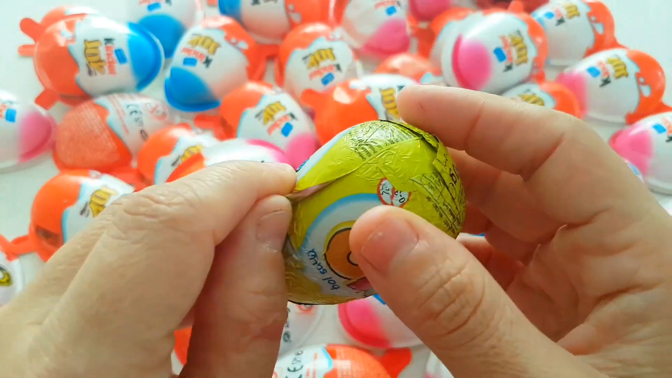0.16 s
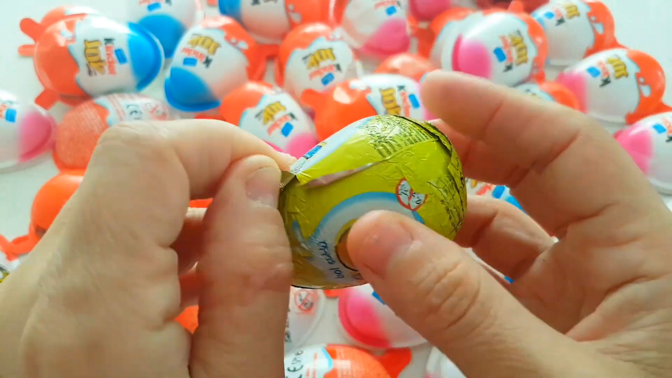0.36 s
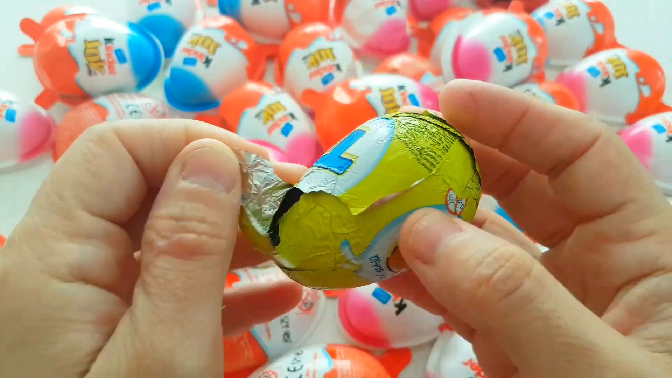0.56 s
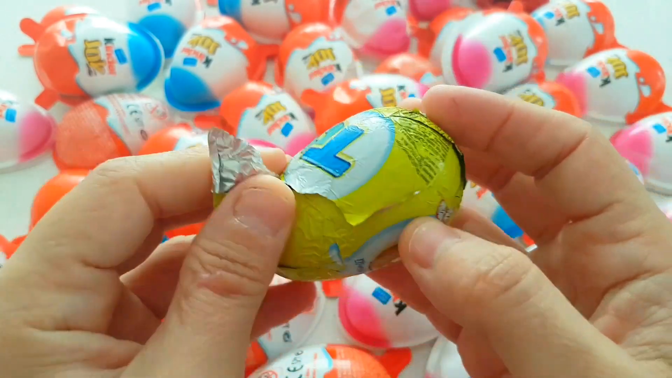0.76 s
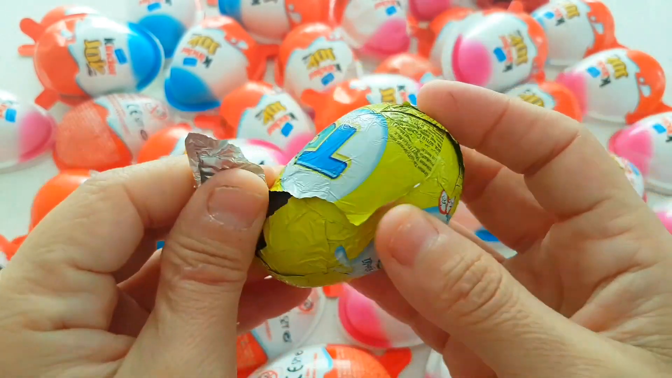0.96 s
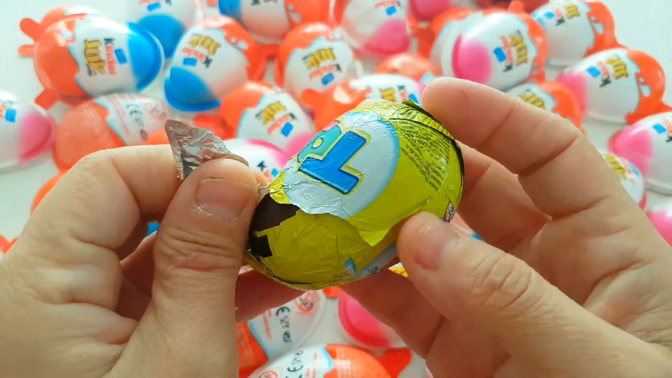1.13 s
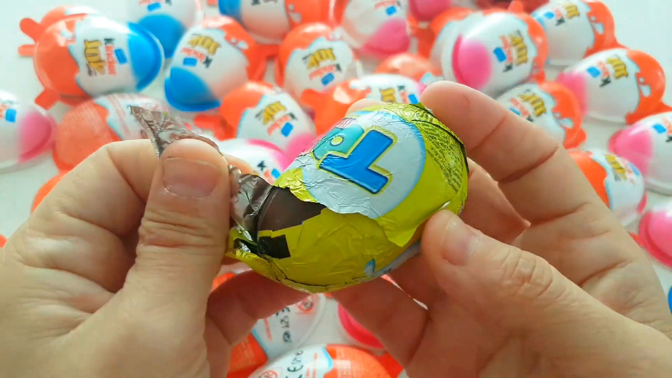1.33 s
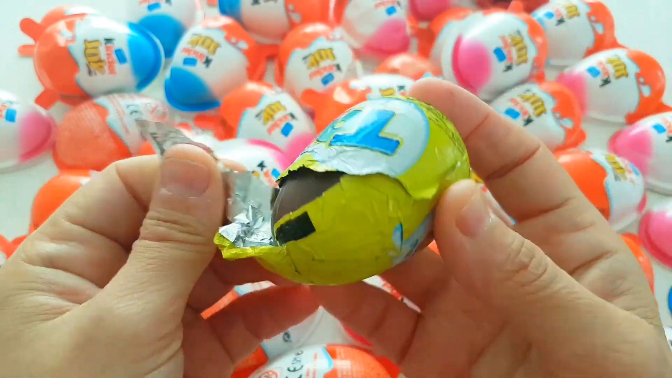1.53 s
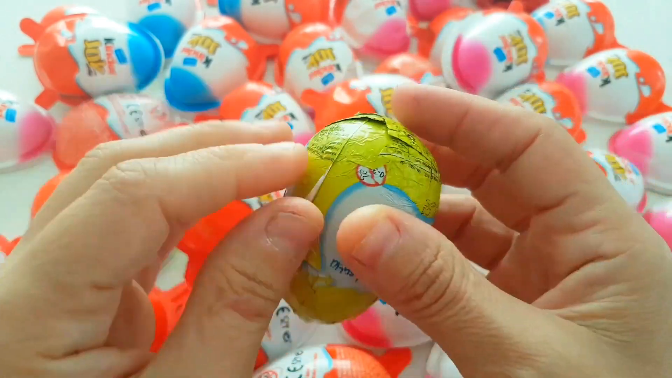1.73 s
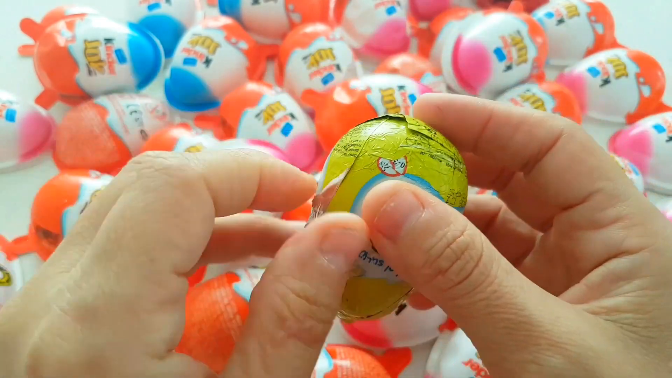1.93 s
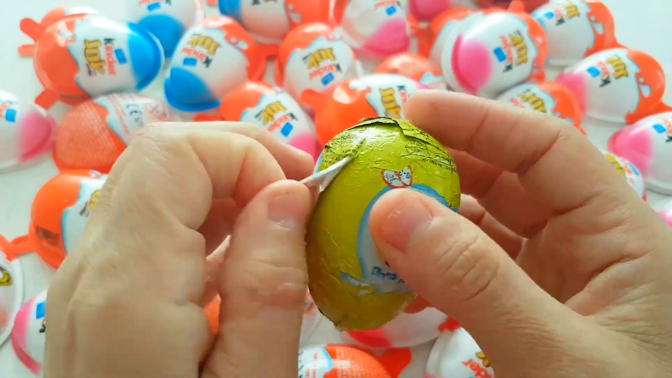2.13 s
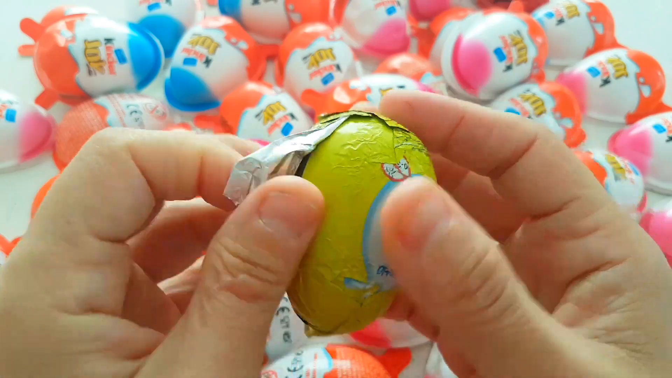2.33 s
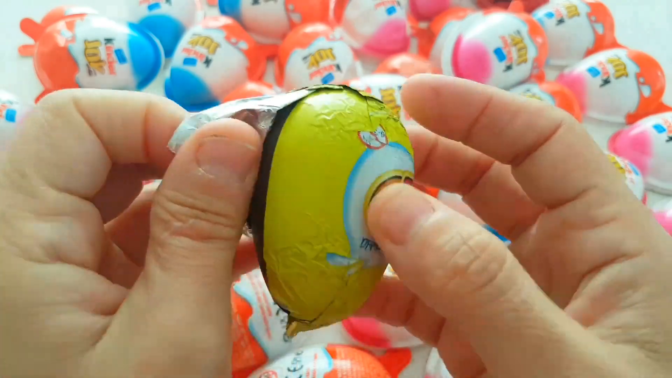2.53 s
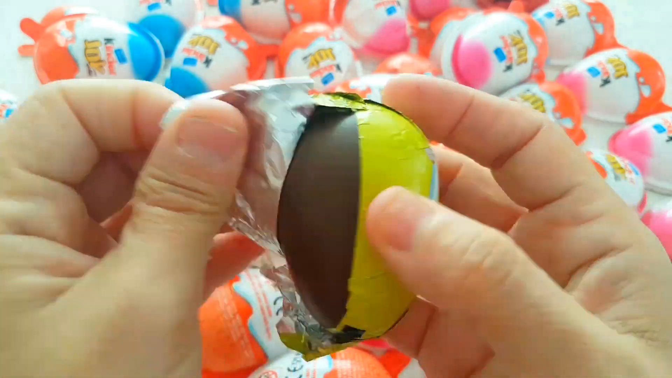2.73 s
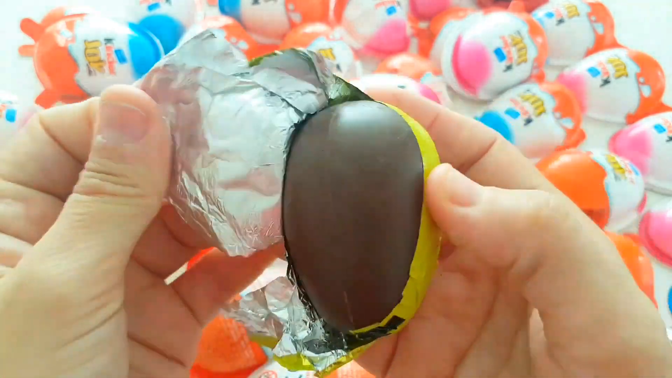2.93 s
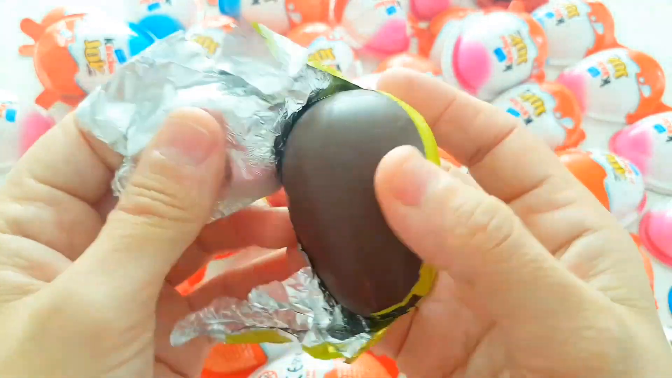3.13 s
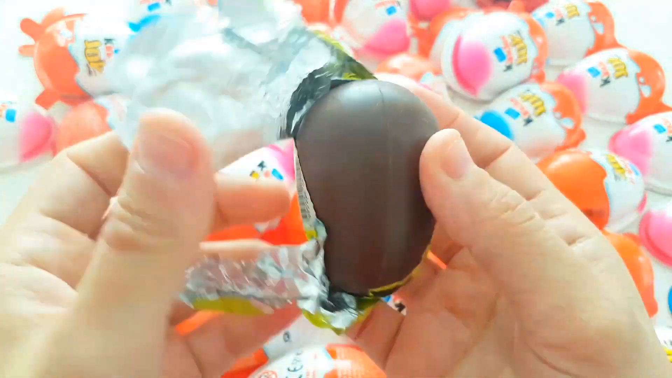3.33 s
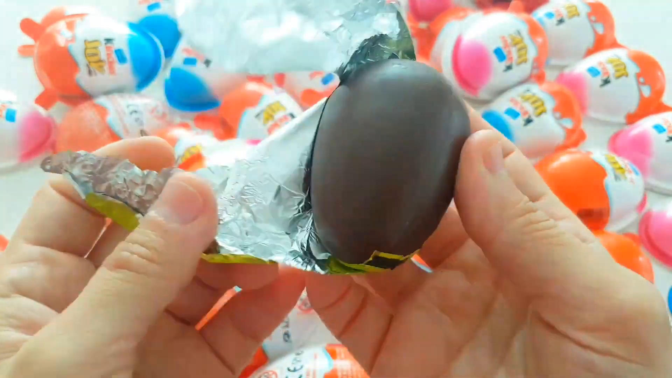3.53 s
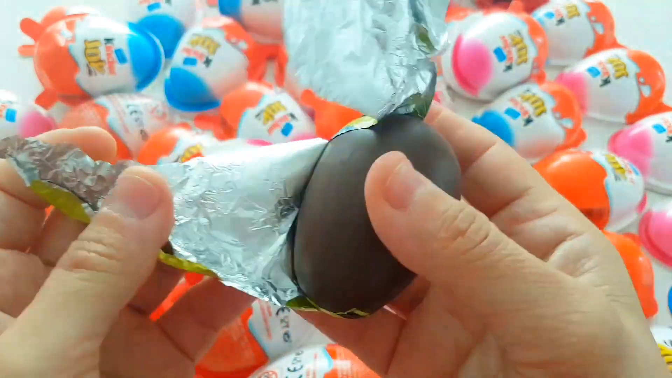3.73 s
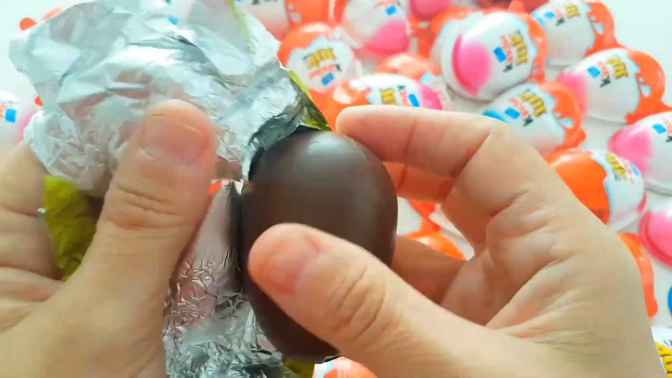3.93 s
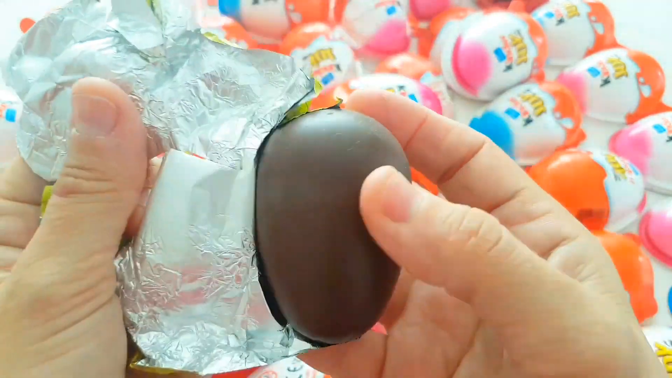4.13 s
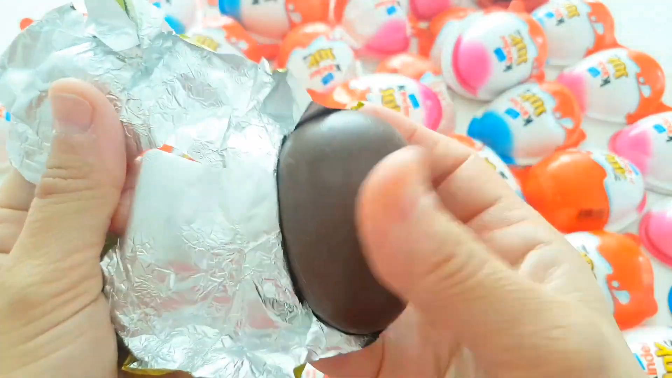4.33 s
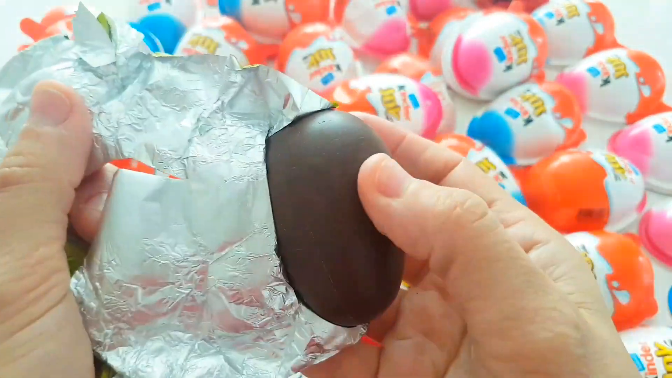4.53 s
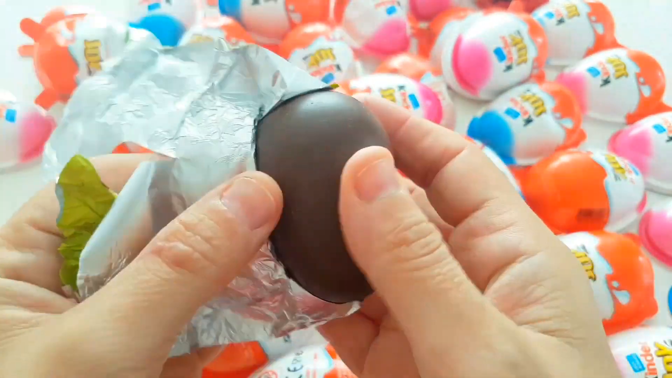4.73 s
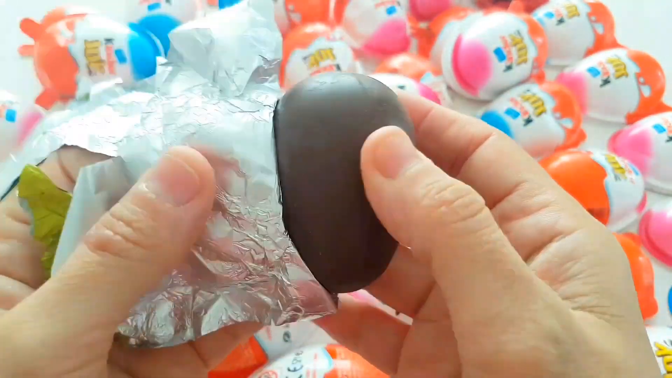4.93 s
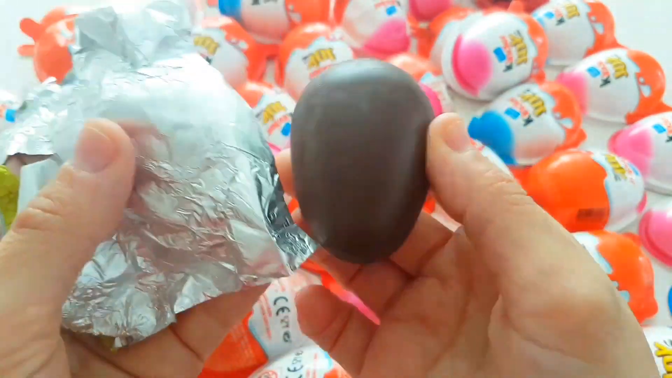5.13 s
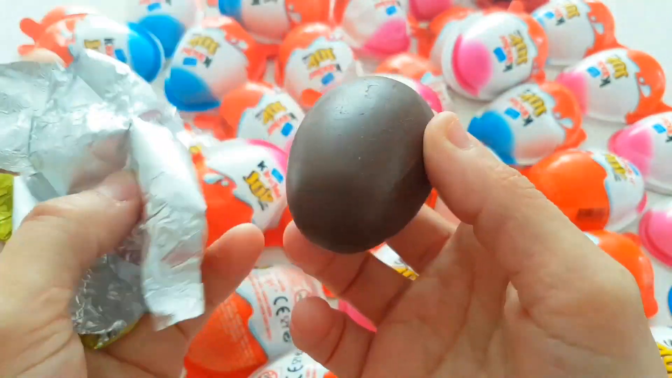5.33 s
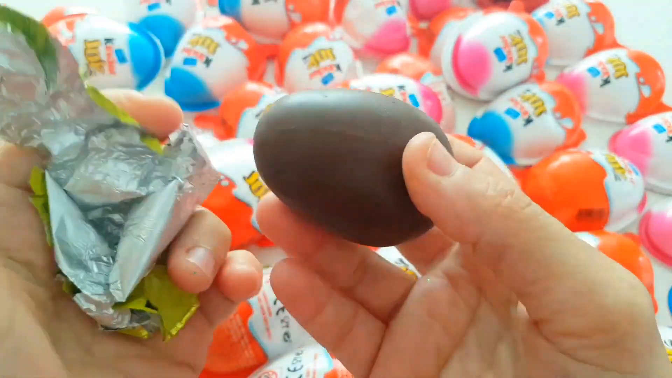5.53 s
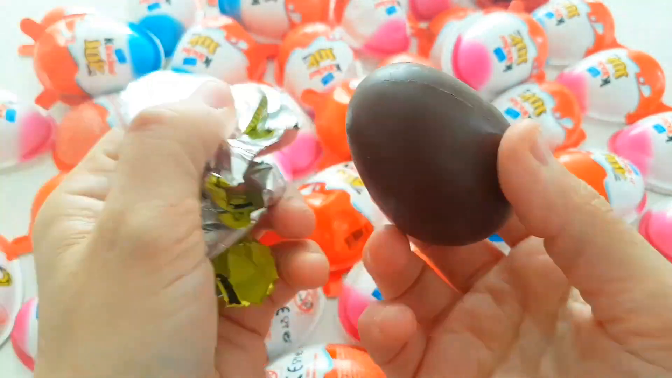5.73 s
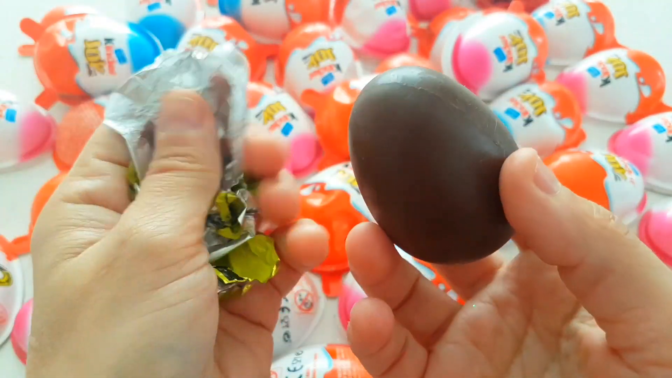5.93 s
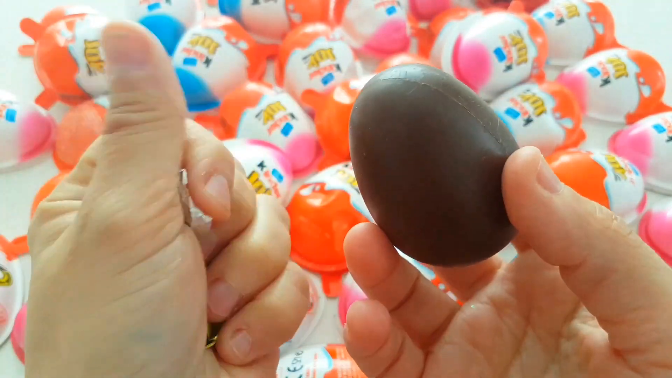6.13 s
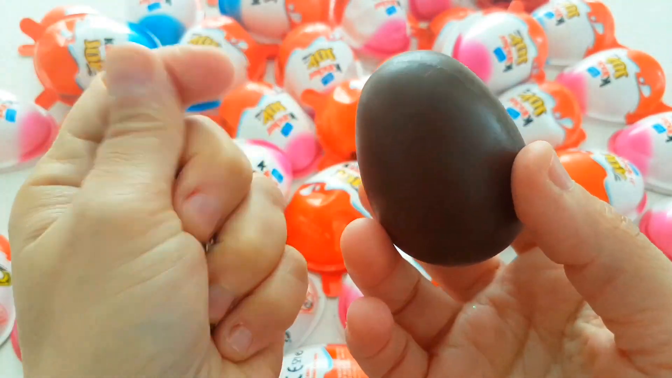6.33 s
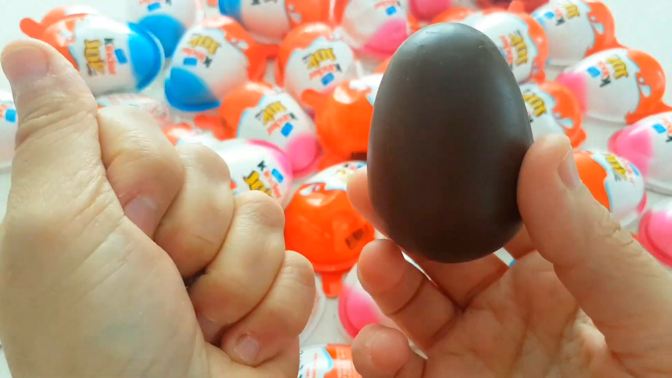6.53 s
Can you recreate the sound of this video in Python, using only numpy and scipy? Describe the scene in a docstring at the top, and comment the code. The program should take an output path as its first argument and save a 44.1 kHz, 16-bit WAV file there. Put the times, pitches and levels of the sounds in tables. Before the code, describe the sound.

Two hands peel thin foil from a chocolate egg close to a stereo microphone in a small quiet room. Faint rubbing and separate bright ticks come first, then denser crackling, sharp creases snapping and soft flaps of the loose sheet. The loudest crinkles come as the foil comes away, followed by a tight crumple in the hand and a few last clicks.

```python
"""A small quiet room: close to a stereo microphone, two hands peel thin foil off a chocolate egg and crumple it.
Creases snap through as short noise bursts with a few ringing modes; small ridges tick.
Around the snaps, random trains of tiny buckles gate noise into a rustle over a faint sliding hiss.
The foil sounds in three registers: sharp ridges tick, the facets between them crackle, the loose sheet flexes.
Damped sines make soft flaps; moving palms, near reflections, a faint tail, rumble and hiss surround it all."""
import sys
import numpy as np
from scipy import signal
from scipy.fft import rfft, irfft
from scipy.io import wavfile
from scipy.ndimage import map_coordinates

SR = 44100
rng = np.random.default_rng(int(sys.argv[2]) if len(sys.argv) > 2 else 0)


def store_wav(level_fs):
    """Save 16-bit WAV to argv[1]."""
    pcm = np.round(np.clip(np.atleast_2d(level_fs), -1, 1) * 32767)
    wavfile.write(sys.argv[1], SR, pcm.T.astype(np.int16))


N = 293706

# Room rumble and microphone hiss. Each row: frequency in Hz, relative level in dB per Hz.
ROOM_TONE = [(15, -20), (50, 3.5), (140, -4), (220, -2), (500, -12), (1200, -19), (3500, -27.5),
             (15000, -38.5)]
# The left port faces the foil, the right is shaded. Each row: frequency in Hz, right port gain in dB.
RIGHT_SHADE = [(100, -9), (800, -1.5), (1400, -3.5), (2400, -1), (4500, -1.5), (7000, -5), (10000, -9.5),
               (14500, -12.5)]
# How much of the right port comes straight from the foil.
# Each row: frequency in Hz, direct amplitude share from 0 to 1.
DIRECT_SHARE = [(100, 0.96), (900, 0.55), (2400, 0.69), (4000, 0.54), (7000, 0.07), (15000, 0.35)]
# The hands around the foil. Each row: time in seconds, how closed from 0 to 1,
# delay to the right port in ms.
HANDS = [(0, 0.59, 0.087), (.9, 0.26, 0.13), (1.5, 0.18, 0.15), (2.6, 0.02, 0.11), (3.5, 0.26, 0.11),
         (4.3, 0.11, 0.17), (5.2, 0.01, 0.19), (6.0, 0.18, 0.13), (6.25, 0.57, .14), (6.66, 0.7, 0.15)]
# The hollow of a fully closed hand. Each row: frequency in Hz, gain in dB.
HAND_HOLLOW = [(400, -15), (900, 5.5), (1200, 5.5), (1600, 16.5), (2150, -9), (3000, 6), (5500, 2)]
# The loose sheet flaps or a finger bumps the egg.
# Each row: start in seconds, level in dB before a common trim, pitch in Hz.
FLAP_EVENTS = [(0.594, -41, 211), (3.032, -31.5, 355), (3.945, -44.5, 146), (4.074, -36.5, 380),
               (4.63, -38.5, 255), (4.656, -39.5, 129), (4.702, -31, 435), (5.14, -38.5, 316)]
# Colour of the foil. Each row: frequency in Hz, relative level in dB per Hz.
FOIL_COLOUR = [(100, -17.5), (300, -12), (580, -9.5), (780, -5), (1020, -5.5), (1300, -12), (1700, -7.5),
               (2000, -3.5), (2350, 2), (3000, -5.5), (4500, -6.5), (7000, -7), (10000, -6.5), (14300, 0),
               (15800, -11)]
# Heft says how large a part of the foil moves: below 0 a few bright ridges, above 0 the loose sheet.
# Registers, from ridges to sheet. Each row: low edge in Hz, high edge in Hz, buckle decay in ms,
# rustle trim in dB, snap trim in dB, dB gained per dB of heft.
FOIL_REGISTERS = [(5880, 16000, 2.2, 0.5, -1.5, -0.33), (1426, 6000, 4.4, -2, -7, -0.0957),
                  (129.8, 1378, 0.67, -10, -14.5, 0.683)]
# Light rubbing of the foil held between pulls, as a curve.
# Each row: time in seconds, level in dB before heft and trim, heft in dB.
GRIP_CURVE = [(0.1, -69.5, 12), (0.29, -57.5, 0.5), (0.55, -62.5, 4), (0.68, -73, 3.5), (0.77, -61.5, -7),
              (1.19, -69.5, -33), (1.41, -57, 3.5), (1.74, -72, 9), (1.9, -70, 7), (2.37, -53.5, -2),
              (2.55, -61, -4), (2.82, -50.5, -2.5), (3.3, -66.5, 9), (5.225, -61.5, -0.5),
              (5.26, -46.5, 1.5), (6.06, -43.5, -5.5), (6.29, -62, -18), (6.5, -59, 2), (6.56, -80.5, 1)]
# The fingers pull at the foil, and at the end squeeze it.
# Each row: start in seconds, length in seconds, level in dB before heft and trim, heft in dB.
PULL_EVENTS = [(0.117, 0.033, -56.5, -40), (0.36, 0.055, -53, -3), (0.437, 0.081, -48, -3),
               (0.7, 0.033, -46, 3), (0.926, 0.021, -48.5, -5), (1.219, 0.016, -54.5, -27),
               (1.278, 0.097, -49, -7.5), (1.462, 0.022, -42.5, -14), (1.576, 0.026, -54, -13),
               (1.617, 0.031, -48.5, -9), (1.867, 0.017, -61, -28), (2.03, 0.0052, -66.5, -26),
               (2.053, 0.0083, -59, -24), (2.15, 0.092, -52, -10), (2.271, 0.045, -50, 4),
               (2.403, 0.0082, -47.5, -6), (2.45, 0.021, -56.5, -15), (2.678, 0.072, -51, -14.5),
               (2.76, .028, -42.5, -1.5), (2.858, 0.095, -42, 5.5), (2.967, 0.11, -42, 2.5),
               (3.105, 0.082, -43.5, 3.5), (3.266, 0.098, -44.5, 2), (3.414, 0.043, -47, 5.5),
               (3.478, 0.017, -37.5, -1), (3.552, 0.041, -43, 8), (3.637, 0.029, -54, -8),
               (3.715, 0.024, -55, 16), (3.742, 0.079, -45, 8), (3.881, 0.095, -49, 6),
               (3.943, .075, -40.5, 2.5), (4.027, 0.058, -45.5, 5), (4.104, 0.072, -53.5, -1),
               (4.211, 0.082, -47.5, 5.5), (4.412, 0.057, -55.5, -6), (4.488, 0.0088, -48.5, -11),
               (4.577, 0.084, -51.5, 4), (4.636, .075, -44.5, -1), (4.725, 0.035, -38, 6.5),
               (4.806, 0.1, -49, 9), (4.93, 0.13, -45.5, 4), (5.081, 0.024, -43.5, 2),
               (5.129, 0.013, -31, 5), (5.24, .1, -40.5, 4.5), (5.428, .085, -39, -1),
               (5.579, 0.023, -40, -10.5), (5.737, 0.12, -36.5, 1.5), (5.89, 0.079, -37, 0.5),
               (6.194, 0.061, -46.5, -13.5), (6.308, 0.033, -51.5, -8), (6.355, 0.063, -53.5, -10.5)]
# Small single ridges popping over. Each row: start in seconds, level in dB.
TICK_EVENTS = [(0.2163, -40.5), (0.357, -46), (0.38, -38), (0.4961, -37.5), (0.461, -42), (0.846, -50),
               (1.0829, -33.5), (1.1165, -45), (1.1415, -45.5), (1.2025, -43.5), (1.346, -44),
               (1.8365, -44), (1.9558, -47), (2.012, -47.5), (2.095, -51), (2.126, -41.5), (2.173, -41),
               (2.4759, -35), (2.484, -41), (2.5391, -37), (2.611, -45.5), (2.664, -44.5), (2.7772, -38),
               (3.118, -32), (3.5366, -38), (3.785, -40.5), (3.8213, -34), (3.976, -32), (4.164, -42),
               (4.209, -39.5), (4.2435, -37), (4.282, -36), (4.352, -46), (4.381, -38), (4.47, -34),
               (4.7774, -34), (4.969, -33), (5.236, -39), (5.4744, -45), (5.5513, -49), (5.902, -35),
               (6.1363, -44), (6.3315, -36), (6.4514, -52), (6.4713, -46), (6.5197, -51.5)]
# Folds collapsing. Each row: start in seconds, level in dB before heft and trim, heft in dB,
# decay in ms before the register stretches it.
SNAP_EVENTS = [(0.314, -43.5, 5.5, 0.96), (0.4014, -43.5, 7, 0.43), (0.5466, -43, 0, 0.86),
               (0.578, -41.5, -27, 0.86), (0.5953, -31.5, 5, 1.2), (0.7169, -44, 18, 0.45),
               (0.808, -57, 25, 0.7), (0.9217, -43.5, -23.5, 0.36), (0.9337, -45, 11, 0.51),
               (0.9548, -44.5, -19, 1.6), (1.2599, -45.5, -51, 1.2), (1.303, -43, -39, 1.5),
               (1.4749, -36, -6.5, 0.94), (1.5901, -32, 0, 3.1), (1.731, -63, 35.5, 0.76),
               (2.222, -44, -11, 1.1), (2.289, -41, 18.5, 1.2), (2.3725, -39.5, -7, 2.4),
               (2.8199, -35.5, 8, 1.2), (2.866, -39.5, 23, 0.9), (2.8807, -29.5, 10, 5.4),
               (2.9476, -29, -16, 1.5), (3.034, -42, 10, 1.9), (3.0706, -32, 0, 1.2),
               (3.146, -27, -1.5, 0.7), (3.255, -32.5, -10, 2.9), (3.268, -35, 2, 0.4),
               (3.2757, -30.5, 5, 1.5), (3.3083, -33.5, 21.5, 0.86), (3.3283, -38, -29, 1.7),
               (3.4151, -43.5, 32.5, 0.32), (3.448, -33.5, 12, 1.4), (3.4828, -25, 2.5, 0.52),
               (3.4962, -31.5, -4, 1.8), (3.554, -36, 12.5, 0.85), (3.5824, -35, 5, 2),
               (3.728, -41, 18, 1.5), (3.76, -32.5, 10.5, 1.8), (3.9189, -47.5, -46, 1.9),
               (3.9664, -40, -10, 2.4), (4.0138, -30, 12.5, 0.65), (4.1286, -34.5, -4, 2.9),
               (4.2617, -36.5, -33.5, 0.82), (4.422, -32, -0.5, 3.2), (4.4606, -34.5, -1, 2.2),
               (4.5373, -31, 7, 2.2), (4.5808, -31.5, -3, 3.7), (4.6519, -40, 20, 3.9),
               (4.8938, -31.5, -4, .9), (4.9373, -24, 5, 5.4), (4.9467, -29.5, 12.5, 4.2),
               (4.9842, -34, 9, 1.8), (5.024, -28.5, 8.5, 3.4), (5.0324, -35, -6, 1.1),
               (5.1003, -45, 13, 1.1), (5.1356, -25, -4, 0.67), (5.143, -24.5, 8.5, .8),
               (5.3021, -30.5, 15.5, 0.69), (5.3245, -32.5, -7, 0.88), (5.4426, -31, 8, 1.3),
               (5.495, -23.5, -1.5, 3), (6.047, -39.5, -23, 0.82), (6.2177, -37, -16, 1.8),
               (6.3156, -49.5, -11, 3.2), (6.495, -51, 20.5, 0.41)]

ROOM_TONE_MID_DB = -67   # the part both ports share
PULL_ATTACK_S, RELAX_DB_PER_S = 0.0036, 641   # the foil settles when a pull stops
LIGHT_TOUCH_DB = -46   # here fizz and sparse grains weigh the same
CUTOFF_HZ = 15700
TIME = np.arange(N) / SR
GRID = np.maximum(np.fft.rfftfreq(4096, 1 / SR), 1)   # filter frequencies in Hz


def from_db(db):
    """Decibels to gain."""
    return 10 ** (np.asarray(db) / 20)


def rms_one(x):
    """Scale to unit power."""
    return x / np.sqrt(np.mean(x ** 2) + 1e-20)


def at_hz(points):
    """Read a spectrum table on the filter grid, along log frequency."""
    hz, value = np.transpose(points)
    return np.interp(np.log(GRID), np.log(hz), value)


def in_time(rows):
    """Each column of a curve table at every sample."""
    s, *columns = np.transpose(rows)
    return [np.interp(TIME, s, c) for c in columns]


def shape(x, gain):
    """Causal (minimum-phase) filter with the given gain per frequency, built by folding the cepstrum."""
    cepstrum = irfft(np.log(np.maximum(gain, 1e-5)))
    half = len(cepstrum) // 2
    cepstrum[1:half] *= 2
    cepstrum[half + 1:] = 0
    response = irfft(np.exp(rfft(cepstrum)))[:half]
    filtered = signal.fftconvolve(np.atleast_2d(x), response[None], axes=1)
    return filtered[:, :N].reshape(np.shape(x))


def drift(rate):
    """Smooth random curve with spread 1 that changes about `rate` times a second."""
    knots = rng.standard_normal(N // 10)
    return rms_one(np.interp(TIME * rate, np.arange(len(knots)), knots))


def background(alike_hz=900, side_share=0.42):
    """Steady noise: the low rumble is more alike in the two ports than the hiss."""
    gain = rms_one(from_db(at_hz(ROOM_TONE)))
    apart = side_share + (1 - side_share) * GRID / (GRID + alike_hz)
    mid, side = rng.standard_normal((2, N))
    shared = shape(mid, gain)
    opposed = shape(side, gain * apart) * np.array([[1], [-1]])
    return from_db(ROOM_TONE_MID_DB) * (shared + opposed)


def room(x, wet_db=-16, t60=0.031, gap_s=0.0017, dull_hz=7000):
    """Faint, dull reflections from the table and the walls, as decaying noise after a short gap."""
    t = TIME[:SR // 2]
    response = rng.standard_normal((2, len(t))) * from_db(-60 * t / t60) * (t > gap_s)
    response /= np.sqrt(np.sum(response ** 2, axis=1, keepdims=True))
    wet = signal.fftconvolve(x[None], response, axes=1)[:, :N]
    return from_db(wet_db) * shape(wet, 1 / np.sqrt(1 + (GRID / dull_hz) ** 2))


def ports(direct, scattered, lag_ms):
    """The right port hears the foil later and duller, mixed with sound scattered by the hands."""
    share = at_hz(DIRECT_SHARE)
    late = map_coordinates(direct, [np.arange(N) - lag_ms * SR / 1000], order=3)
    right = shape(late, share) + shape(scattered, np.sqrt(1 - share ** 2))
    return np.array([direct, shape(right, from_db(at_hz(RIGHT_SHADE)))])


def palm_echo(x, strength=0.26, delay_ms=1.0, wander_ms=0.35):
    """A reflection off the moving palms combs the sound with ripples that never stay put."""
    delay = np.maximum(delay_ms + wander_ms * drift(7), .3)
    late = np.arange(N) - delay * SR / 1000
    echo = np.array([map_coordinates(channel, [late], order=3) for channel in x])
    return (x + strength * echo) / np.sqrt(1 + strength ** 2)


def hand_hollow(x, closed):
    """The air in a closing hand colours the foil, blended in by how closed the hand is."""
    hollow = shape(x, from_db(at_hz(HAND_HOLLOW)))
    return x + closed * (hollow - x)


def flaps(level_db=2.0, cycles=0.94, rise_s=0.00043):
    """A soft push of air, damped by the fingers within about a cycle."""
    out, t = np.zeros(N + SR), TIME[:4096]
    for s, event_db, hz in FLAP_EVENTS:
        start = int(s * SR)
        envelope = np.exp(-t * hz / cycles) * (1 - np.exp(-t / rise_s))
        push = np.sin(2 * np.pi * hz * t) * envelope
        out[start:start + len(t)] += from_db(event_db + level_db) * push
    return out[:N]


def register_gain(low_hz, high_hz):
    """One register's part of the foil colour, with unit power gain."""
    edges = 1 / np.sqrt((1 + (low_hz / GRID) ** 10) * (1 + (GRID / high_hz) ** 10))
    return rms_one(from_db(at_hz(FOIL_COLOUR)) * edges)


def handling(per_heft):
    """Level of the rustle in dB: the grip, plus pulls that rise quickly, hold and die away."""
    grip_db, grip_heft = in_time(GRIP_CURVE)
    power = from_db(grip_db + per_heft * grip_heft) ** 2
    for start, length, level_db, heft in PULL_EVENTS:
        span = slice(int(start * SR), int((start + length + .5) * SR))
        t = TIME[span] - start
        attack = np.clip(t / PULL_ATTACK_S, 0, 1)
        release = from_db(-RELAX_DB_PER_S * np.maximum(t - length, 0))
        power[span] += (from_db(level_db + per_heft * heft) * attack * release) ** 2
    return 10 * np.log10(power)


def grains(per_s, spread_db):
    """Random single buckles of uneven strength, as energy with mean 1."""
    strength_db = spread_db * np.minimum(rng.standard_normal(N), 1.5)
    energy = (rng.random(N) < per_s / SR) * from_db(strength_db) ** 2
    return energy / np.mean(energy)


def buckles(fine_per_s=2600, fine_db=1.0, pop_per_s=110, pop_db=3.0, clump_db=-0.5, pop_share=.35):
    """Buckle energy: a fizz of tiny buckles in avalanches, and sparse sharper pops."""
    avalanches = rms_one(from_db(clump_db * drift(170))) ** 2
    # the fingers stick and slip, so the crackle comes in short surges
    surges = rms_one(from_db(2.2 * drift(42))) ** 2
    fizz = (1 - pop_share) * grains(fine_per_s, fine_db) * avalanches
    pops = pop_share * grains(pop_per_s, pop_db)
    return surges * (fizz + pops)


def crackle():
    """Energy of the buckles: a firm pull sets off a dense fizz, a light touch sparse, uneven grains."""
    light = 1 / (1 + from_db(handling(0) - LIGHT_TOUCH_DB) ** 2)
    dense = buckles()
    sparse = buckles(fine_per_s=640, fine_db=6.5, pop_per_s=64, pop_db=4.0, clump_db=5.0)
    return (1 - light) * dense + light * sparse


def fade(power, decay_ms):
    """Spread each burst of energy over an exponential decay; the time is that of its amplitude."""
    r = np.exp(-2000 / (decay_ms * SR))
    return signal.lfilter([1 - r], [1, -r], power + 1e-18)


def rustle(energy, level_db, low_hz, high_hz, decay_ms, slide=0.03, variety_db=4.0):
    """Buckles over a faint sliding hiss; five pitch bands wander so that buckles differ in pitch."""
    gain = register_gain(low_hz, high_hz)
    place = np.clip(np.log(GRID / low_hz) / np.log(high_hz / low_hz), 0, 1)
    centres = np.linspace(0, 1, 5)
    level, out = from_db(level_db), 0
    for centre in centres:
        band = np.sqrt(np.maximum(1 - abs(place - centre) / centres[1], 0))
        favour = rms_one(from_db(variety_db * np.minimum(drift(250), 1.5))) ** 2
        envelope = np.sqrt(slide + (1 - slide) * fade(energy * favour, decay_ms)) * level
        out = out + shape(rng.standard_normal((2, N)) * envelope, gain * band)
    return out


def cracks(rows, gain, ring=0.34, after_db=3.0, tail_db=-29, tail_ms=10.0, scatter_ms=.35):
    """A sharp break, the crease running on with a few modes of its own, and a faint shiver.

    Rows hold start in seconds, level in dB, decay in ms. Returns direct and longer scattered sound.
    """
    out, t = np.zeros((2, N + SR)), TIME[:2048]
    weight = np.cumsum(gain ** 2) / np.sum(gain ** 2)
    width = np.mean(gain ** 2) ** 2 / np.mean(gain ** 4)   # share of all frequencies the register fills
    for s, level_db, decay_ms in rows:
        # four modes, likeliest where the register is strong
        hz = np.interp(rng.random((4, 1)), weight, GRID)
        modes = np.sin(2 * np.pi * hz * t).sum(axis=0) * np.sqrt(width)
        decays = decay_ms + np.array([[0], [scatter_ms]])
        running = np.exp(-1000 * t / decays)
        breaking = running ** 4
        shiver = from_db(tail_db) * np.exp(-1000 * t / tail_ms)
        envelope = breaking + from_db(after_db) * running + shiver
        burst = (rng.standard_normal((2, len(t))) + ring * modes) * envelope
        energy = np.mean(abs(rfft(burst, 2 * len(t)) * gain) ** 2, axis=1, keepdims=True)
        start = int(s * SR)
        # levels are rms over five milliseconds
        out[:, start:start + len(t)] += from_db(level_db) * burst * np.sqrt(.005 * SR / energy)
    return shape(out[:, :N], gain)


def ticks(decay_ms=0.42, low_hz=8500, slope=1.4):
    """A single ridge is so small that its tick thins out towards the low notes."""
    gain = register_gain(860, 19700) * np.minimum(GRID / low_hz, 1) ** slope
    return cracks([(s, level_db, decay_ms) for s, level_db in TICK_EVENTS], rms_one(gain))


def snaps(gain, trim_db, per_heft, stretch):
    """Collapsing folds as one register hears them, weighted by heft and lengthened by the stretch."""
    rows = [(s, level_db + trim_db + per_heft * heft, decay_ms * stretch)
            for s, level_db, heft, decay_ms in SNAP_EVENTS]
    return cracks(rows, gain)


def scene():
    """The same buckles drive all three registers, heard through the hands, the ports and the room."""
    closed, lag_ms = in_time(HANDS)
    energy, foil = crackle(), ticks()
    for k, (low_hz, high_hz, decay_ms, rustle_db, snap_db, per_heft) in enumerate(FOIL_REGISTERS):
        # facets and sheet ring on after the ridge
        stretch = 1.3 if k == 0 else 2.7
        foil += snaps(register_gain(low_hz, high_hz), snap_db, per_heft, stretch)
        foil += rustle(energy, handling(per_heft) + rustle_db, low_hz, high_hz, decay_ms)
    foil = palm_echo(hand_hollow(foil, closed))
    foil[0] += flaps()   # only in the direct sound
    # the far walls leave a faint tail in the pauses
    far_walls = room(foil[0], wet_db=-20, t60=0.32, gap_s=0.0084, dull_hz=6060)
    return ports(*foil, lag_ms) + room(foil[0]) + far_walls + background()


def record(dry):
    """A steep elliptic low-pass cuts the top."""
    top_cut = signal.ellip(10, .2, 70, CUTOFF_HZ, fs=SR, output="sos")
    return signal.sosfilt(top_cut, dry)


dry = scene()
out = record(dry)
store_wav(out)
```